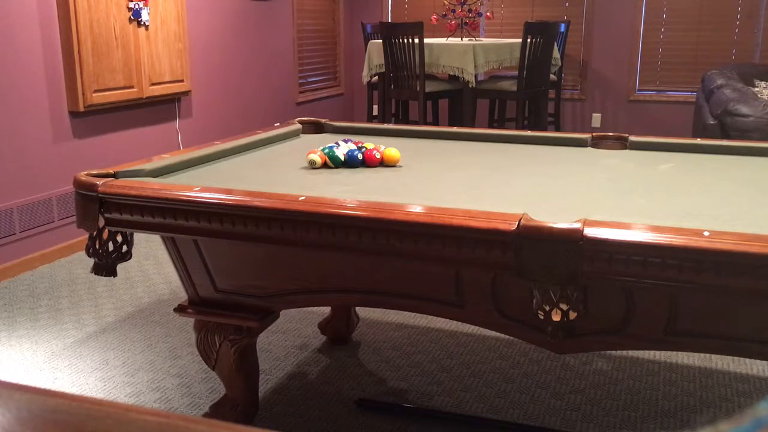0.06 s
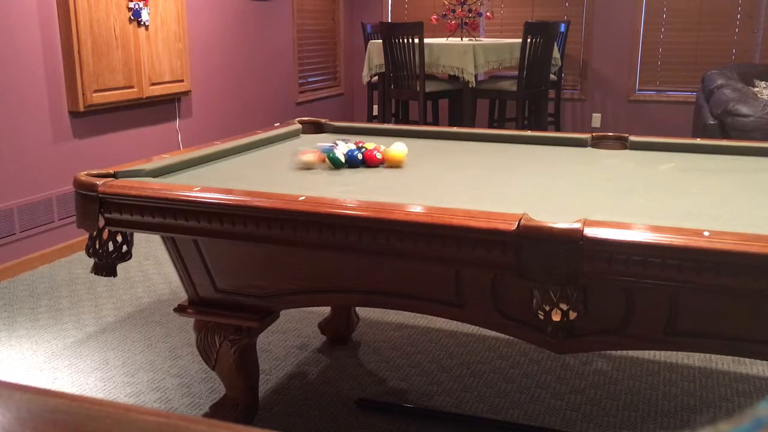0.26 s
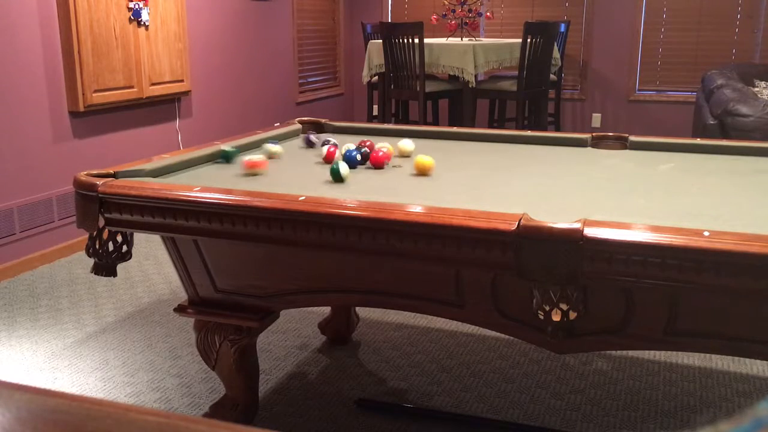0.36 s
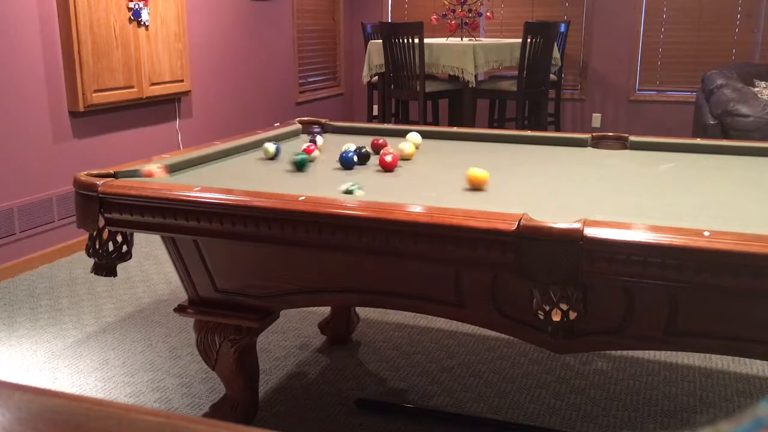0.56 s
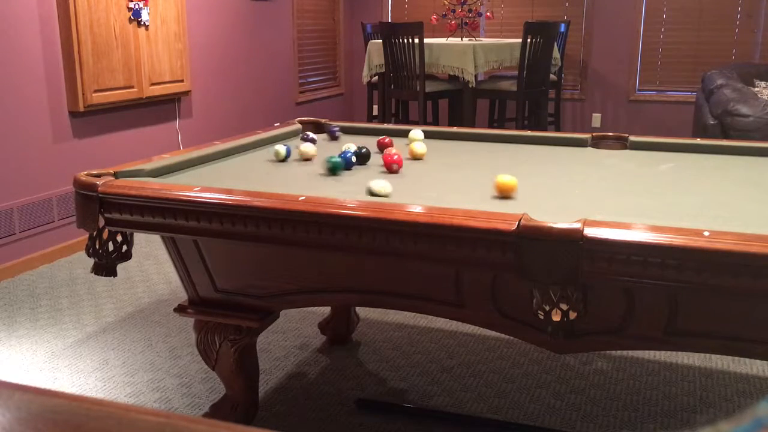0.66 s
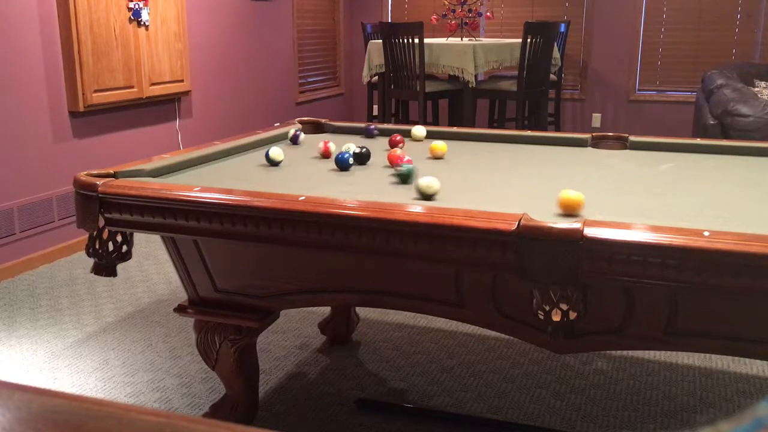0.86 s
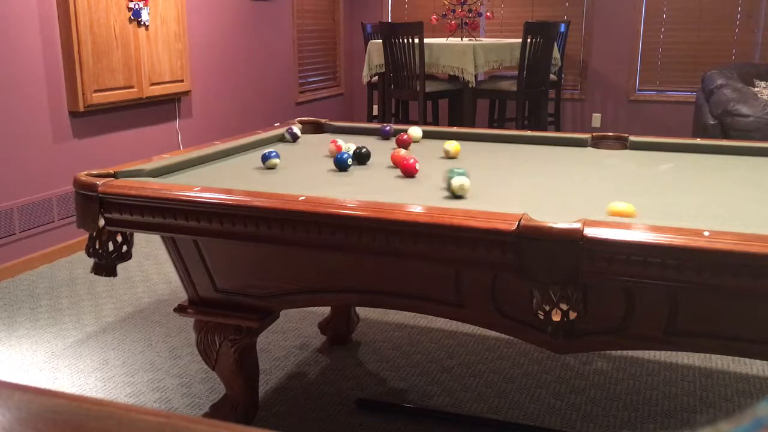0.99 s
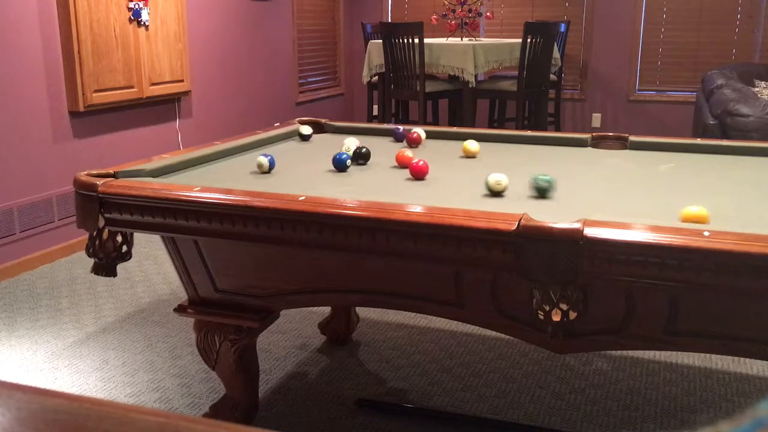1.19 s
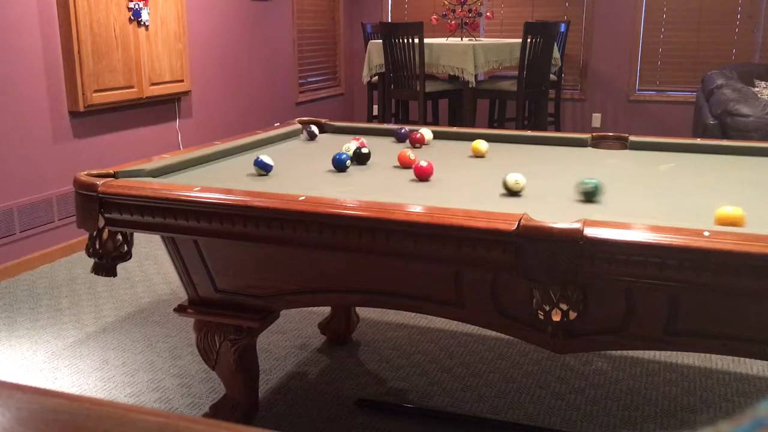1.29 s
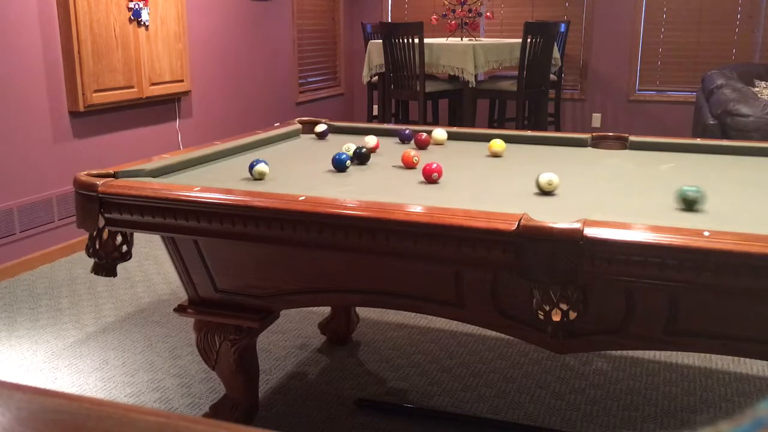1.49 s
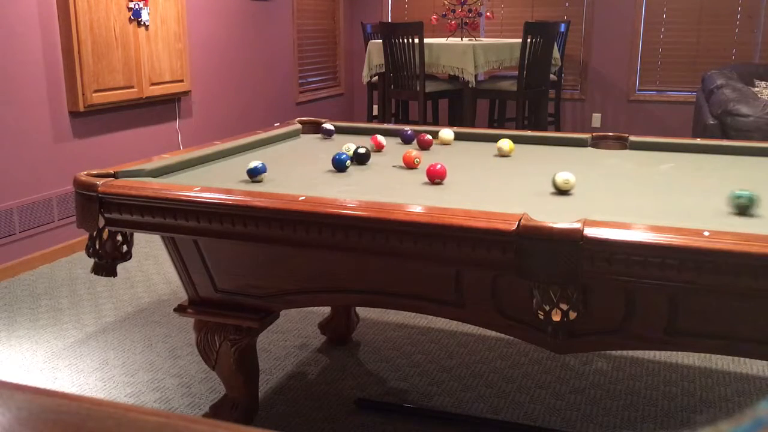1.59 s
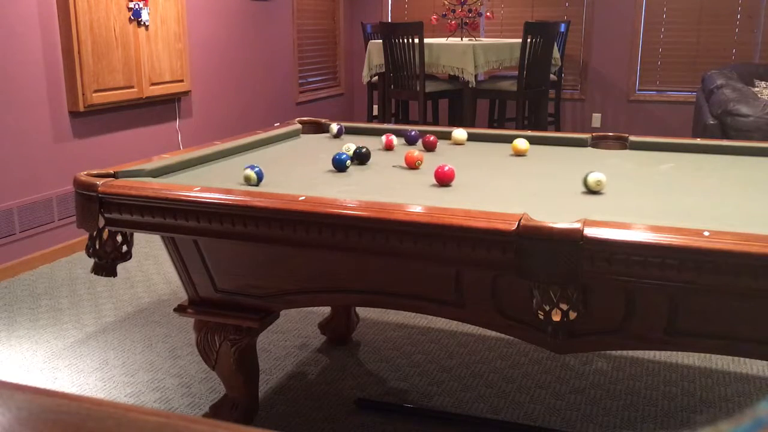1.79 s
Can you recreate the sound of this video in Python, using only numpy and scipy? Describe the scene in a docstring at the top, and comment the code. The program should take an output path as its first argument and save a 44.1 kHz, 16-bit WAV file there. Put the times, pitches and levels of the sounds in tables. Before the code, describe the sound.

Billiard balls are broken on a slate table: a short cue snap, a bright explosive cluster of clacks, soft thumps and rumble, sparse later clicks fading to quiet, picked up by a small mono microphone across a home room.

```python
"""A carpeted room with a pool table: a break shot, heard from a few metres away.
The cue cracks against the cue ball in short noise bursts and rings; the ball skips once and smashes into the rack.
Balls clack as short filtered pulses, two of them echoed off the ceiling, and thud into cushions and slate as
swelling tones with a knock of noise. Shaped noise makes the rumble of rolling balls, light ticks, two faint
swishes and the quiet air. Cracks, clacks, thuds and ticks also feed a diffuse room tail."""
import sys
import numpy as np
from scipy import signal
from scipy.fft import rfft, irfft, next_fast_len
from scipy.io import wavfile

SR = 44100
rng = np.random.default_rng(int(sys.argv[2]) if len(sys.argv) > 2 else 0)


def transcribe(signal):
    """Save signal, clipped to [-1, 1], as a 16-bit WAV file at the path in sys.argv[1]."""
    frames = np.atleast_2d(signal).T
    limited = np.clip(frames, -1, 1)
    pcm = np.round(limited * 32767).astype(np.int16)
    wavfile.write(sys.argv[1], SR, pcm)


N = 81585  # length in samples, 1.85 s


def clacks(size=2048, lead=64):
    """Ball clacks, with two echoes off the ceiling: each is one short pulse, rounder the longer the balls touch."""
    # Clacks, and two ceiling echoes at 0.4064 and 0.7913 s. Each row: start in seconds, level in dB,
    # brightness in Hz (higher for a shorter contact), send to the room in dB.
    clacks_and_ceiling_echoes = [(0.3938, 9, 4210, 5.5), (0.3982, 3.5, 3273, -5), (0.4045, 4.5, 3900, -7.5),
                                 (0.4064, 6, 3500, -8.5), (0.4307, 3, 3210, -11), (0.7798, -11.5, 3020, 2),
                                 (0.7913, -20.5, 2323, -0.5), (1.1856, -26.5, 3830, 3),
                                 (1.2225, -24, 2095, -5), (1.2360, -28, 2030, -2), (1.2606, -17.5, 3000, 4),
                                 (1.269, -22.5, 2900, -4.5), (1.3713, -9.5, 2700, -4)]
    # Spectrum of a hard clack. Each row: frequency in Hz, level in dB.
    clack_spectrum = [(100, -34.5), (300, -20.5), (600, -17.5), (950, -13), (1550, -1), (2600, 0.5),
                      (4300, -9), (6000, -8.5), (7500, -15), (11000, -12.5), (16000, -26.5)]
    slope = 6.7  # exponent of the treble loss above the brightness
    edge_db, hard_hz, edge_power = -21.5, 4000, 2.5  # the sharp edge weakens for duller pulses
    scatter_db, scatter_s = -8, 0.0015  # sound bouncing among the neighbouring balls

    out = np.zeros((2, N))
    sharp = rfft(click(clack_spectrum, size))
    t = np.arange(size) / SR
    cloud = np.sqrt(t) * np.exp(-1.5 * t / scatter_s)
    cloud = cloud / np.linalg.norm(cloud)
    for start, db, bright_hz, room_db in clacks_and_ceiling_echoes:
        rounded = 1 / (1 + (bins(size) / bright_hz) ** slope)
        edge = amp(edge_db) * (bright_hz / hard_hz) ** edge_power
        scatter = rfft(rng.standard_normal(size) * cloud)
        pulse = irfft(sharp * (rounded + edge) * (1 + amp(scatter_db) * scatter))
        # The rounding spreads the pulse both ways in time, so leave some samples ahead of it.
        pulse = np.roll(pulse, lead)
        add(out, start - lead / SR, amp(db) * pulse / np.linalg.norm(pulse), room_db)
    return mirrored(out)


def cue(size=16384):
    """The tip scrapes the ball for a few milliseconds, as decaying noise, and the shaft cracks and rings in sines."""
    # Tip contact, then the crack of the shaft. Each row: start in seconds, level in dB,
    # decay time constant in seconds, brightness in Hz.
    stroke_bursts = [(0.2114, -26, 0.0054, 2200), (0.2135, -18.5, 0.0023, 3500),
                     (0.2158, -15, 0.0034, 15000)]
    # Spectrum of the bursts. Each row: frequency in Hz, level in dB.
    cue_spectrum = [(30, -40.5), (110, -27), (240, 2), (450, -2), (750, 1.5), (1200, 1.5), (2000, -3),
                    (3800, -9.5), (5600, -3), (7000, -6), (9500, -0.5), (11000, -6.5), (13700, -17.5),
                    (16000, -16.5)]
    # Rings of the cue. Each row: frequency in Hz, level in dB, time to fall 60 dB in seconds.
    cue_modes = [(1125.2, -32, .22), (1085, -34, .2), (755, -31, 0.3), (518.6, -31.5, 0.52),
                 (3494, -44, .15), (3950, -40, .1), (5470, -30.5, .04), (6290, -39.5, 0.099),
                 (7900, -27.5, 0.033), (9386, -27, 0.026)]
    burst_room_db, ring_room_db = 0.5, -8

    out, t = np.zeros((2, N)), np.arange(size) / SR
    for start, db, decay_s, bright_hz in stroke_bursts:
        dulling = 1 / np.hypot(1, bins(size) / bright_hz)
        burst = noise(cue_spectrum, size, dulling) * np.exp(-t / decay_s)
        add(out, start, amp(db) * burst, burst_room_db)
    ring = np.zeros(size)
    for hz, db, t60 in cue_modes:
        ring += amp(db) * np.sin(2 * np.pi * hz * t) * np.exp(-np.log(1000) * t / t60)
    crack_start = stroke_bursts[-1][0]
    add(out, crack_start, ring, ring_room_db)
    return out


def thuds(size=16384):
    """Soft blows on cushion or slate swell the table's main resonance and knock its wooden frame."""
    # Each row: start in seconds, level in dB, pitch in Hz, swell in seconds, knock of the frame in dB.
    table_blows = [(0.214, -22, 239.9, 0.0087, -29), (0.324, -18, 250, 0.011, -28),
                   (0.368, -32.5, 243, 0.0078, -28.5), (0.446, -31.5, 241.6, 0.0077, -39),
                   (0.498, -26.5, 235.8, 0.023, -22), (0.538, -26, 231.3, 0.027, -27.5),
                   (0.579, -31.5, 234.9, 0.0078, -30.5), (0.621, -25.5, 219, 0.01, -29.5),
                   (0.698, -23, 232.1, 0.027, -25.5), (0.745, -26.5, 242.4, 0.018, -29.5),
                   (0.830, -43.5, 244, 0.023, -35.5), (0.959, -33, 245, 0.023, -33.5),
                   (1.008, -32, 238.6, .011, -40.5), (1.100, -41.5, 224.4, 0.065, -45),
                   (1.182, -32, 262.3, 0.02, -32), (1.232, -38, 244, 0.015, -61)]
    # Spectrum of the frame's knock. Each row: frequency in Hz, level in dB.
    knock_spectrum = [(35, -42.5), (52, -23), (70, 0), (88, -11), (118, 4), (160, -11.5), (235, 5),
                      (300, -7.5), (390, -12), (480, -19), (680, -25), (1000, -40.5), (2500, -65),
                      (8000, -95)]
    swell_power, room_db = 2.2, -9
    knock_rise_s, knock_t60_s = 0.009, 0.23

    out, t = np.zeros((2, N)), np.arange(size) / SR
    knock_env = (1 - np.exp(-t / knock_rise_s)) * np.exp(-np.log(1000) * t / knock_t60_s)
    for start, db, hz, swell_s, knock_db in table_blows:
        swell = (t / swell_s * np.exp(1 - t / swell_s)) ** swell_power  # peaks at swell_s
        boom = swell * np.sin(2 * np.pi * hz * t)
        knock = knock_env * noise(knock_spectrum, size)
        add(out, start, amp(db) * boom + amp(knock_db) * knock, room_db)
    return out


def rolling(t):
    """The slate rumbles under the balls: low noise that rises and falls along a level curve."""
    # Each row: time in seconds, level in dB.
    roll_levels = [(0.21, -74), (0.26, -43), (0.45, -55.5), (0.56, -39), (0.8, -41), (0.95, -48),
                   (1.15, -39.5), (1.33, -44.5), (1.44, -54), (1.6, -59.5), (1.85, -63)]
    # Spectrum of the rumble. Each row: frequency in Hz, level in dB.
    rumble_spectrum = [(25, -35.5), (48, -19.5), (69, 3.5), (88, -3.5), (116, 4), (160, -9), (240, -5.5),
                       (320, -21), (500, -35), (1000, -45.5), (3000, -65), (8000, -95)]
    times, levels_db = np.array(roll_levels).T
    return amp(np.interp(t, times, levels_db)) * steady(rumble_spectrum)


def ticks(size=2048):
    """Small bright, grainy taps around the table: noise with a very short decay."""
    # Each row: start in seconds, level in dB, send to the room in dB.
    tick_times = [(0.6954, -35, -14), (0.779, -35.5, -10), (0.8144, -29, 5), (1.1529, -47.5, -3.5),
                  (1.179, -37, 2.5), (1.1853, -40, -2), (1.2530, -50, -7.5), (1.2610, -41, 2),
                  (1.3096, -25.5, 0), (1.4508, -48, -6)]
    # Spectrum of a tick. Each row: frequency in Hz, level in dB.
    tick_spectrum = [(500, -21), (2000, 9), (3800, 1), (5200, -6), (6900, 4), (8300, -7), (11000, -4.5),
                     (15000, -22)]
    decay_s = 0.0015

    out, t = np.zeros((2, N)), np.arange(size) / SR
    fade = np.exp(-t / decay_s)
    fade = fade / np.linalg.norm(fade)
    for start, db, room_db in tick_times:
        add(out, start, amp(db) * noise(tick_spectrum, size) * fade, room_db)
    return mirrored(out)


def swish(t):
    """Faint slides, like the cue pushed and drawn back through the hand: bright noise that swells and fades."""
    # Each row: centre in seconds, width of the swell to either side in seconds, level in dB.
    cue_slides = [(.195, .03, -72.5), (0.947, .055, -68)]
    # Spectrum of the slides. Each row: frequency in Hz, level in dB.
    swish_spectrum = [(1500, -20), (4500, -5), (7000, -7), (10000, 0), (12500, -5.5), (16000, -16.5)]
    swell = sum(amp(db) / np.cosh((t - centre) / width) for centre, width, db in cue_slides)
    return steady(swish_spectrum) * swell


def quiet():
    """Still air of the room: steady noise, strongest in the bass."""
    # Each row: frequency in Hz, level in dB.
    air_spectrum = [(25, -1.5), (60, -6), (120, -1.5), (260, -4), (400, -12.5), (700, -20), (1500, -19.5),
                    (4000, -29), (10000, -32.5), (16000, -38.5)]
    return amp(-70.5) * steady(air_spectrum)


def mirrored(track):
    """Bed, rails and ceiling repeat the direct sound within a few milliseconds."""
    # Near reflections. Each row: delay in seconds, level in dB.
    near_echoes = [(.0009, -12), (.0031, -12.5), (.0044, -13), (0.0097, -14.5)]
    out = track.copy()
    for delay, db in near_echoes:
        lag = int(delay * SR)
        out[0, lag:] += amp(db) * track[0, :-lag]
    return out


def room(x, size=32768):
    """Diffuse tail: sparse reflections thicken and fade, the treble first."""
    # Decay of the tail. Each row: frequency in Hz, time to fall 60 dB in seconds.
    band_decays = [(100, .7), (300, .58), (1000, .54), (2500, .54), (5000, .47), (9000, .36), (15000, .29)]
    # Colour of the tail. Each row: frequency in Hz, level in dB.
    tail_colour = [(100, -1.5), (500, 3.5), (1000, 3.5), (2500, -.5), (5000, -1.5), (9000, -6.5),
                   (15000, -7)]
    build_s, sparse_s, grain_db = 0.0035, 0.034, 3.5

    t, hz = np.arange(size) / SR, bins(size)
    # Uneven grain sizes make the early tail sparse; the unevenness dies away.
    spread = np.log(amp(grain_db)) * np.exp(-t / sparse_s)
    unevenness = np.clip(rng.standard_normal(size), -2, 2)
    grains = rng.standard_normal(size) * np.exp(spread * unevenness - spread ** 2)
    spectrum = rfft(grains) * amp(along(tail_colour, hz))

    # Overlapping bands that add up to the whole spectrum, each with its own decay.
    centres = [centre for centre, _ in band_decays]
    tail = np.zeros(size)
    for share, (_, t60) in zip(np.eye(len(centres)), band_decays):
        rate = np.log(1000) / t60
        band = irfft(spectrum * along(list(zip(centres, share)), hz))
        tail += band * np.exp(-rate * t) * np.sqrt(2 * rate / SR)
    return signal.fftconvolve(x, tail * (1 - np.exp(-t / build_s)))[:N]


def add(track, start, x, room_db):
    """Mix a sound into the direct path and the path to the room."""
    i = int(start * SR)
    x = x[:N - i]
    track[0, i:i + len(x)] += x
    track[1, i:i + len(x)] += amp(room_db) * x


def click(points, size=2048):
    """Short causal click of unit energy with the given spectrum, its energy as early as possible."""
    cepstrum = irfft(np.log(amp(along(points, bins(size)))))
    # Folding the cepstrum onto positive times gives minimum phase.
    cepstrum[1:size // 2] *= 2
    cepstrum[size // 2 + 1:] = 0
    h = irfft(np.exp(rfft(cepstrum)))
    return h / np.linalg.norm(h)


def steady(points):
    """Noise of the given spectrum, lasting throughout."""
    return noise(points, count=next_fast_len(N))[:N]


def noise(points, count, gain=1):
    """Noise of unit rms: the given spectrum, times a gain per frequency, with random phases."""
    hz = bins(count)
    phases = np.exp(2j * np.pi * rng.random(len(hz)))
    x = irfft(gain * amp(along(points, hz)) * phases, count)
    return x / x.std()


def along(points, hz):
    """Read a table on a log-frequency axis."""
    f, v = np.array(points, float).T
    return np.interp(np.log(hz + 1), np.log(f), v)  # + 1 avoids the log of zero


def bins(size):
    """Frequencies in Hz of a transform of the given size."""
    return np.arange(size // 2 + 1) * SR / size


def amp(db):
    """Decibels to gain."""
    return 10 ** (np.asarray(db) / 20)


def scene():
    """Stroke, break and scatter over the quiet of the room; two groups reach the walls by different paths."""
    t = np.arange(N) / SR
    hits = np.zeros(N)
    for direct, to_room in (clacks() + thuds(), cue() + ticks()):
        hits += direct + room(to_room)  # each group draws its own room tail
    return (hits + rolling(t) + swish(t) + quiet())[None]


def record(dry):
    """The small microphone drops the deepest bass and the recorder cuts the top."""
    low_cut_hz, top_hz = 66, 16100
    bass_cut = signal.butter(4, low_cut_hz, "high", fs=SR, output="sos")
    top_cut = signal.ellip(8, .2, 70, top_hz, fs=SR, output="sos")  # 0.2 dB ripple, 70 dB stopband
    return signal.sosfilt(top_cut, signal.sosfilt(bass_cut, dry))


dry = scene()
out = record(dry)
transcribe(out)
```